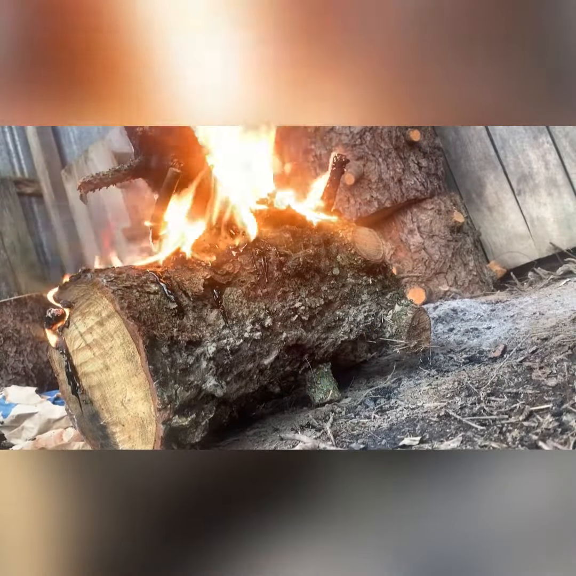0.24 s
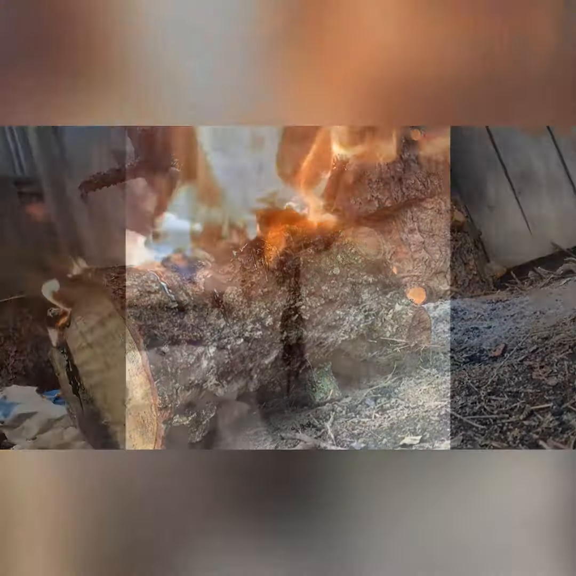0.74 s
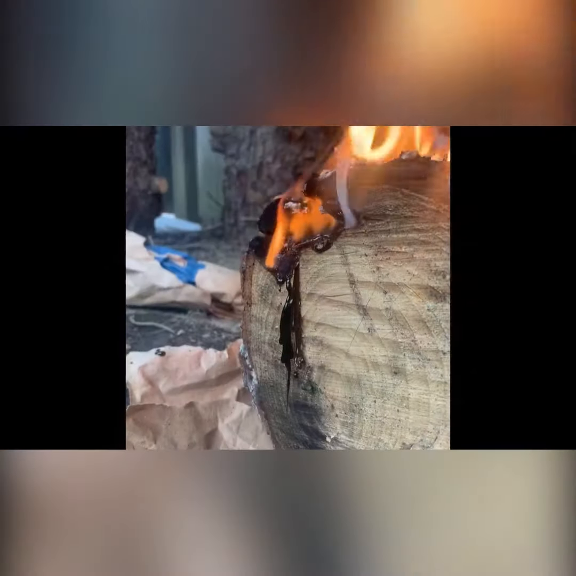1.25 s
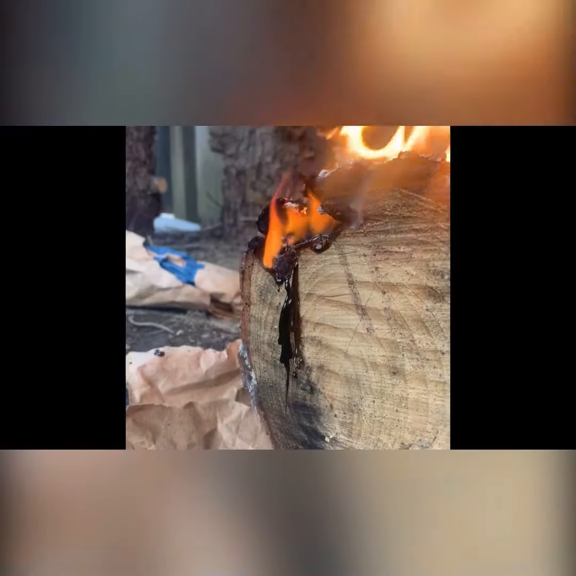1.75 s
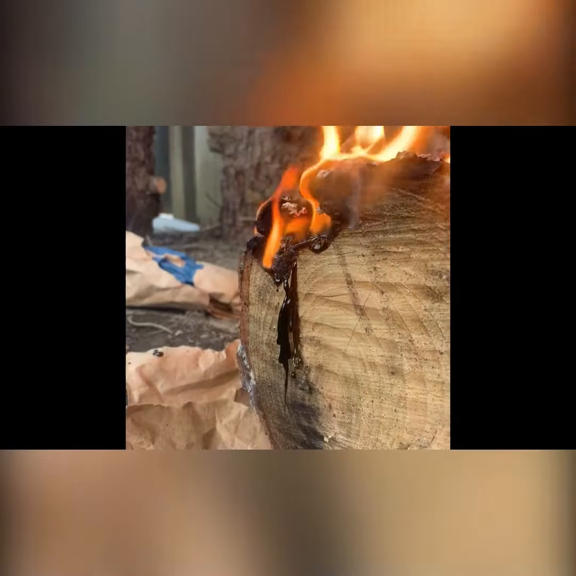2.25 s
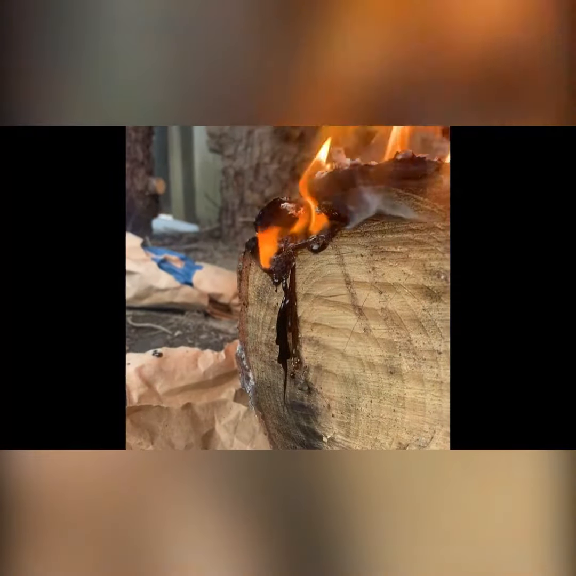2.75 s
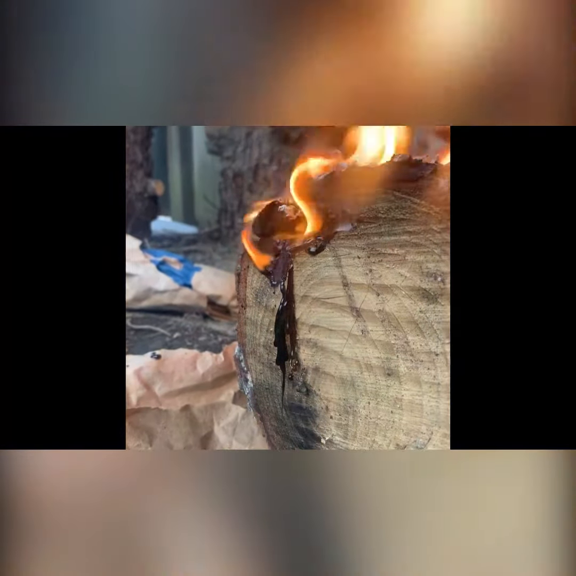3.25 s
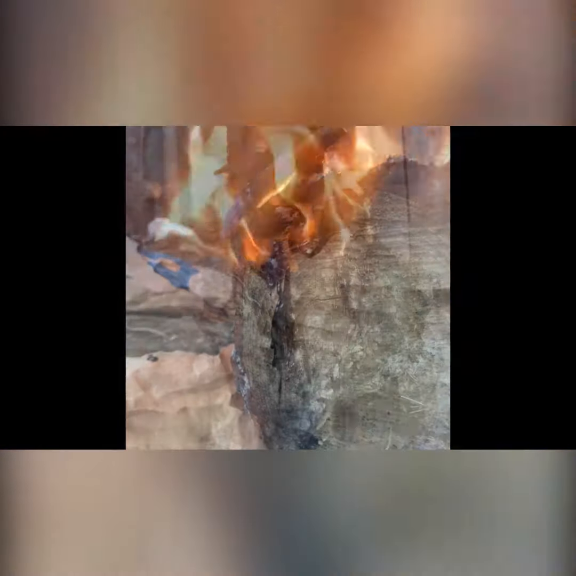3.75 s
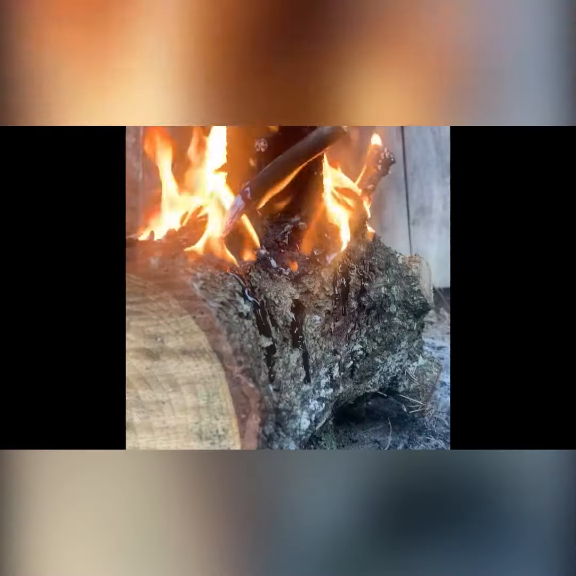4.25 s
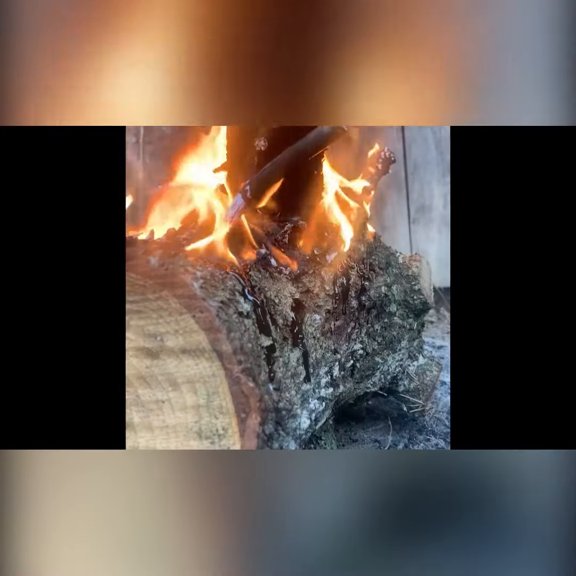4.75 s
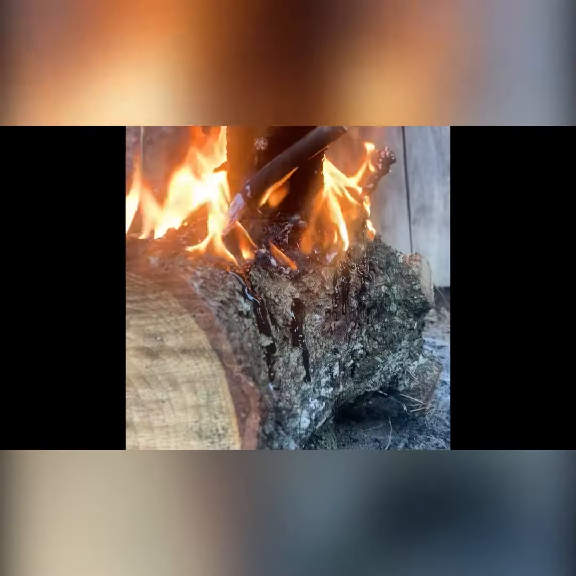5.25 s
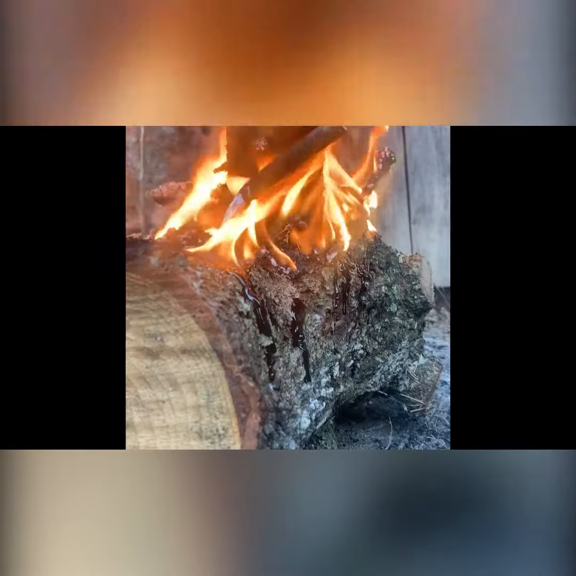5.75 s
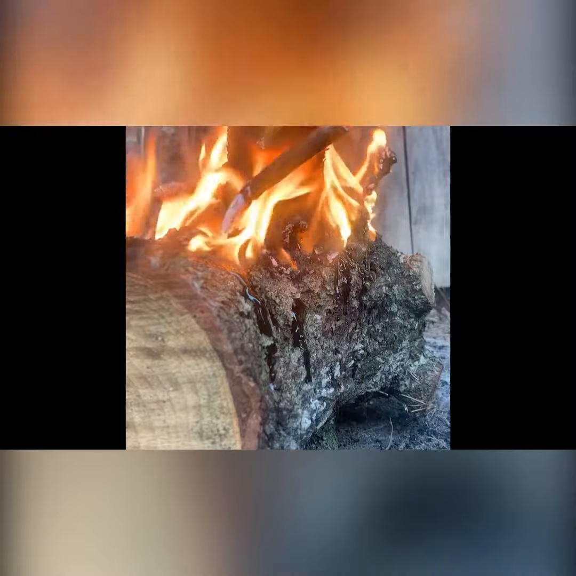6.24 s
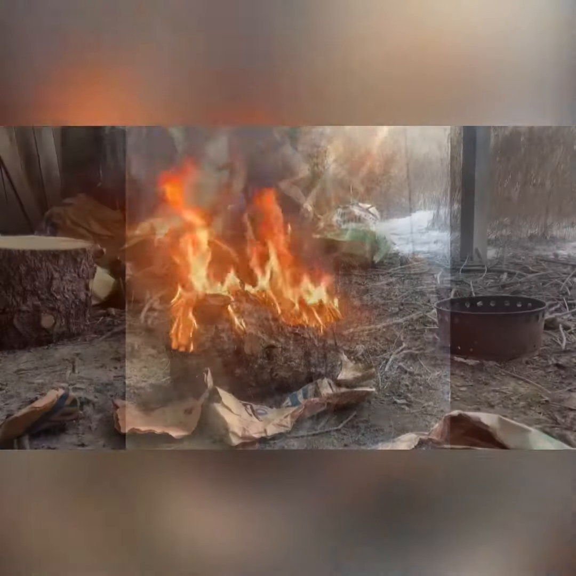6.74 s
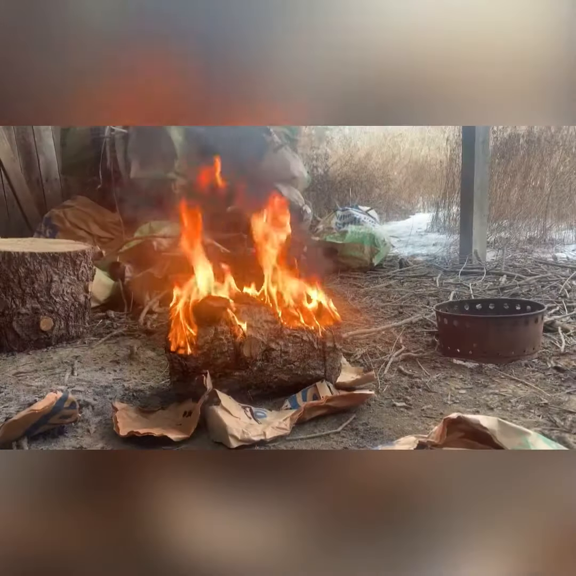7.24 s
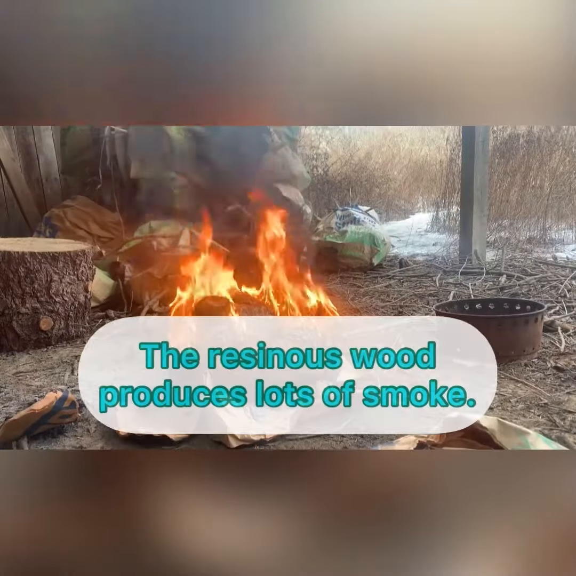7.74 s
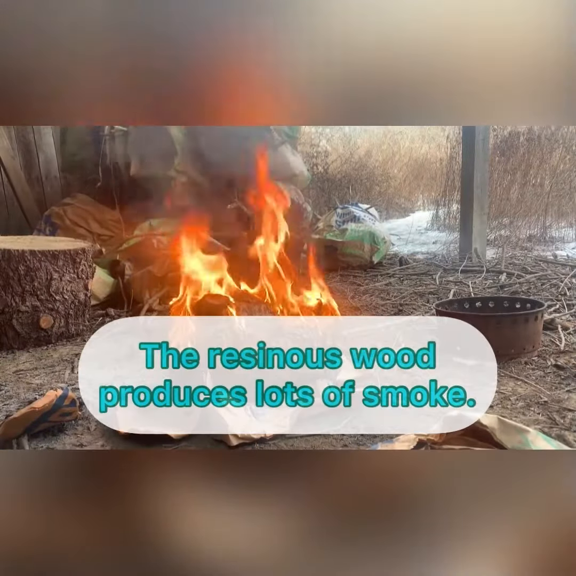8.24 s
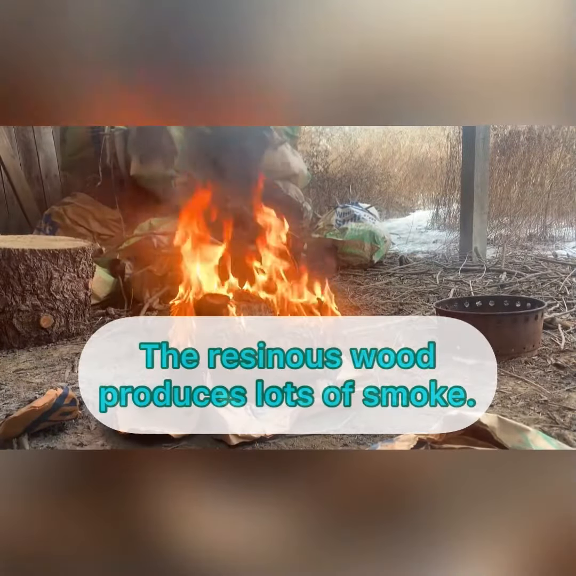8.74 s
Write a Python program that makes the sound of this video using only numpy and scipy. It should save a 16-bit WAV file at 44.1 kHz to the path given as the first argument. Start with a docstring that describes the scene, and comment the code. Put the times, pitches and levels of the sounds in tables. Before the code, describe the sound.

A resinous log burns in an open shed, heard close in stereo. Throughout, a quiet low rumble throbs unevenly, flames flap softly above it, and boiling sap makes a high fizz full of tiny cracks. From 0.3 to 0.75 s a tight cluster of snaps, dull ticks and woody knocks breaks out, then thins. A very loud dry crack comes at 1.8 s, another at 3.2 s, and a strong woody snap at 3.5 s. Steam sputters briefly after some pops, longest around 4.8 s; 4 to 6 s is calmer. Around 6.6 s the position moves quickly farther away and faces the other way: the rumble weakens, while bright pops grow crowded, especially 7.2 to 7.6 s and around 8.2 s. Short dry litter scuffs occur near 6.95, 7.1, 7.35, 7.55 and 8.8 s. A sharp snap lands at 8.8 s; crackling continues to the end at about 9 s.

```python
"""Flames rumble and sap fizzes as a resinous log burns in an open shed, with dull ticks, pops and steam jets
throughout. Two microphone ports a few centimetres apart hear it. Around 6.6 s the listener's place becomes a
farther one, turned the other way, and then dry litter rustles underfoot. Flames, fizz, steam and litter are
shaped noise; pops are spikes and short noise sent through resonances; ticks are brief, noisy sine waves."""
import sys
import numpy as np
from scipy import signal
from scipy.fft import rfft, irfft, next_fast_len
from scipy.io import wavfile
from scipy.ndimage import uniform_filter1d, map_coordinates

SR = 44100
rng = np.random.default_rng(int(sys.argv[2]) if len(sys.argv) > 2 else 0)


def put_to_file(sound):
    """Save the sound as 16-bit audio at rate SR, in the file named by the first command-line argument."""
    columns = np.atleast_2d(sound).T  # one column per channel
    safe = np.clip(columns, -1, 1)
    whole_steps = np.round(safe * 32767)
    wavfile.write(sys.argv[1], SR, whole_steps.astype(np.int16))


N = 397341  # length in samples

# start and end of the move from the near place to the far one: t/s
STEP_BACK = (6.5, 6.75)


def amp(db):
    """Turn decibels into a gain."""
    return 10 ** (np.asarray(db) / 20)


def unit(x):
    """Scale to an average strength (rms) of 1."""
    return x / np.sqrt(np.mean(x ** 2) + 1e-20)


def along(points, hz):
    """Read a value between (f/Hz, value) points on a logarithmic frequency axis."""
    f, value = np.transpose(points)
    return np.interp(np.log(hz + 1), np.log(f + 1), value)


def wobble(rate):
    """A smooth random curve through `rate` random points a second."""
    knots = rng.standard_normal(int(N * rate / SR) + 4)
    return map_coordinates(knots, [np.arange(N) * rate / SR])


def filtered(x, response):
    """Multiply the spectrum of x by a response, which may be complex."""
    m = next_fast_len(N + 8192)
    return irfft(rfft(x, m) * response(np.fft.rfftfreq(m, 1 / SR)), m)[..., :N]


def resonance(centre_hz, width_hz):
    """A ringing band-pass with gain 1 at its centre."""
    return lambda f: 1j * f * width_hz / (centre_hz ** 2 - f * f + 1j * f * width_hz)


def patchy(channels, patchy_db):
    """White noise with patches of random gain in time and pitch, shared by its channels."""
    z = signal.stft(rng.standard_normal((channels, N)), nperseg=512)[2]
    field = uniform_filter1d(rng.standard_normal(z.shape[1:]), size=8, axis=0)
    field = uniform_filter1d(field, size=6, axis=1)
    return signal.istft(z * amp(patchy_db * unit(field)), nperseg=512)[1][:, :N]


def diffuse(spectrum, patchy_db):
    """Stereo noise of rms 1 from all around: the ports hear it alike only where waves are long."""
    # left-right likeness of sound from all around: f/Hz, likeness (1 is the same at both ports)
    likeness = [(60, .985), (130, 0.96), (290, .9), (640, 0.42), (1400, 0.015), (3000, 0.083)]

    def mid_and_side(hz):
        angle = np.arccos(np.clip(along(likeness, hz), -1, 1)) / 2
        return amp(along(spectrum, hz)) * [np.cos(angle), np.sin(angle)]

    mid, side = filtered(patchy(2, patchy_db), mid_and_side)
    return unit(np.array([mid + side, mid - side]))


def bursts(seconds, db, t60, spike, size=600, sputter_db=0):
    """A spike and noise falling 60 dB in t60 seconds at each time, cut after `size` samples."""
    k = np.arange(size)
    # sputtering noise comes in ragged spits of 30 samples
    spit_db = np.clip(rng.standard_normal((len(seconds), size // 30 + 1)), -2, 1.5)
    spits = amp(sputter_db * np.repeat(spit_db, 30, axis=1)[:, :size])
    noise = rng.standard_normal((len(seconds), size))
    shape = spits * noise * amp(-60 * k / SR / np.clip(t60, 1e-4, 1))
    shape[:, 0] = -spike
    where = np.round(seconds * SR).astype(int)[:, None] + k
    return np.bincount(where.ravel(), (amp(db)[:, None] * shape).ravel(), N + size + 1)[:N]


def far():
    """0 at the near place, 1 at the far one, with a straight ramp between."""
    return np.interp(np.arange(N) / SR, STEP_BACK, [0, 1])


def ports(near_sound, far_sound):
    """Sound from the log reaches one port first; the housing makes one port weaker at some pitches."""
    # phase by which the left port leads, a plain delay in the treble, bent by the housing below:
    # f/Hz, phase/rad
    lead_near = [(1200, 0), (3400, 2.8), (4200, 2.2), (5200, 3.2), (12300, 9.4), (17000, 13.7)]
    lead_far = [(1500, 0), (3000, 2.5), (4500, 2), (6500, 3.1), (11700, -3.1), (17000, -10.3)]
    # left port over right port: f/Hz, level difference/dB
    shade_near = [(300, 0), (1000, -3), (2400, -5), (4500, 0), (16000, 0)]
    shade_far = [(300, 0), (1800, 2), (3000, -1), (5500, -4), (7500, 0), (16000, 0)]
    half = np.array([[.5], [-.5]])  # each port takes half of the difference

    def path(lead, shade):
        return lambda hz: (amp(half * along(shade, hz))
                           * np.exp(1j * half * np.interp(hz, *np.transpose(lead))))

    return (filtered(near_sound, path(lead_near, shade_near))
            + filtered(far_sound, path(lead_far, shade_far)))


def placed(sound):
    """Short sounds are heard from one place or the other, switching halfway through the move."""
    # colour of short sounds from afar: f/Hz, gain/dB
    distant_colour = [(1000, -10), (2000, -0.5), (3300, -10.5), (5000, -3.5), (6500, -3.5), (9500, -0.5),
                      (13000, -5.5), (16000, -9)]
    distant = filtered(sound * (far() >= .5), lambda hz: amp(along(distant_colour, hz)))
    return ports(sound * (far() < .5), distant)


def wood(f):
    """The log's broad, dull ring, made of overlapping resonances."""
    return resonance(1800, 1500)(f) * resonance(1500, 3500)(f) - 0.13 * resonance(950, 400)(f)


def control(column):
    """How strongly the fire burns: one column of its table, and its swing about the mean."""
    # the fire, before each layer's own lift and wobble:
    # t/s, flame rumble level/dB, sap fizz level/dB, flapping tongues level/dB
    fire = [(0.0, -47, -60, -64.5), (0.43, -49, -60.5, -59), (0.9, -48.5, -61.5, -64.5),
            (1.36, -46, -58.5, -62.5), (2.53, -47.5, -59, -60.5), (2.76, -43.5, -58.5, -58.5),
            (3.49, -44.5, -56.5, -62.5), (3.86, -48, -59, -65), (4.39, -45, -58, -59),
            (4.84, -46.5, -58, -64), (5.67, -48.5, -59, -63), (6.0, -43, -58.5, -62),
            (6.45, -47, -58.5, -62), (6.75, -49.5, -60, -64.5), (7.98, -52, -61.5, -66),
            (8.16, -49.5, -60.5, -68.5), (8.4, -52, -62, -69.5), (9.01, -50.5, -59.5, -68.5)]
    rows = np.transpose(fire)
    db = np.interp(np.arange(N) / SR, rows[0], rows[column])
    return db, db - db.mean()


def flames():
    """Flames flutter: the rumble throbs, tongues flap above it, a roar swinging with the fizz on top."""
    # noise colours: f/Hz, relative level per Hz/dB
    rumble_colour = [(15, -32), (25, -31.5), (45, -12), (63, -7), (71, 1), (80, -6), (110, -11), (200, -19),
                     (260, -52), (440, -120)]
    flap_near_colour = [(100, -20), (170, -3), (250, -0.5), (330, -10), (500, -15), (700, -23.5),
                        (1000, -64)]
    flap_far_colour = [(120, -31), (220, -7), (330, -9), (450, -7.5), (700, -22.5), (1000, -26.5)]
    roar_colour = [(400, -30), (700, -2), (1000, -0.5), (1600, 5), (2500, -1.5), (4000, 2), (7000, -34)]
    flutter = wobble(14)  # shared by rumble and tongues
    near, away = np.sqrt(1 - far()), np.sqrt(far())

    rumble_db = control(column=1)[0] + 1.88 * flutter + 0.69 * wobble(5.0)
    rumble = amp(rumble_db) * diffuse(rumble_colour, patchy_db=1.1)

    tongues = near * diffuse(flap_near_colour, patchy_db=2.5)
    tongues = tongues + amp(-1.0) * away * diffuse(flap_far_colour, patchy_db=3.0)
    flap_db = control(column=3)[0] + 3.0 + .9 * wobble(7) + 2.1 * flutter + 0.65 * wobble(30)
    flap = amp(flap_db) * tongues

    # the roar swings with the sap fizz, dB for dB
    roar_db = -65.5 + control(column=2)[1] + .6 * wobble(6) + 1.2 * wobble(40)
    roar = amp(roar_db) * diffuse(roar_colour, patchy_db=2.2)
    return rumble + flap + ports(near * roar, away * roar)


def fizz():
    """Boiling sap: a hiss with a hail of tiny cracks in clumps, louder against the hiss from afar."""
    # colour of the fizz: f/Hz, gain/dB
    near_colour = [(1500, -30), (3000, -10), (5000, -4.5), (6500, -4.5), (8000, 0), (10000, -3.5),
                   (16000, -4.5)]
    far_colour = [(1500, -30), (3000, -9), (5500, -8), (7000, -3.5), (8500, 0), (10500, -5), (16000, -5)]
    lift_db = 8.5  # makes up for what the colouring takes away
    walls_db, wood_db = -14.5, -5.5
    top_hz = 16000

    def tint(points):
        return lambda hz: amp(along(points, hz)) * (hz < top_hz) * np.clip(hz / 1500, 0, 1)

    hiss = unit(patchy(2, 3.04) * amp(0.34 * wobble(25) + 0.16 * wobble(150)))
    draw = rng.random((5000, 2))  # a time and a size for each crack
    busy = np.cumsum(amp(6.5 * wobble(18)))  # cracks crowd where this climbs steeply
    seconds = np.interp(draw[:, 0], busy / busy[-1], np.arange(N) / SR)
    from_afar = seconds > STEP_BACK[1]
    size_db = -3.8 * np.log(draw[:, 1]) + 5.4 * from_afar  # few are large
    crack_db = np.minimum(size_db, 13 + 4 * from_afar) - 7.5
    cracks = bursts(seconds, crack_db, 0.004, spike=3.6, size=150)

    level = amp(control(column=2)[0] + lift_db + 0.14 * wobble(7.3))
    near = filtered(level * np.sqrt(1 - far()) * (hiss[0] + cracks), tint(near_colour))
    away = filtered(level * np.sqrt(far()) * (hiss[1] + cracks), tint(far_colour))
    # hiss scattered back from the walls
    scattered = amp(walls_db) * filtered(level * rng.standard_normal((2, N)), tint(far_colour))
    knocks = amp(wood_db) * placed(filtered(level * cracks, wood))
    return ports(near, away) + scattered + knocks


def faint_ticks(count):
    """Faint ticks at chance times, all low, in rows like the timed ones."""
    draw = rng.standard_normal((count, 2))
    seconds = rng.random(count) * N / SR
    db = -52 + 3 * draw[:, 0]
    hz = 325 * np.exp(0.18 * draw[:, 1])
    return np.column_stack([seconds, db, hz])


def ticks():
    """Settling bark and coals: each tick is a push of two or three cycles, softly started."""
    # ticks at set times, strong and weak, before the lift: t/s, level/dB, pitch f/Hz
    timed_ticks = [(0.022, -40, 540), (0.279, -50, 380), (0.327, -38.5, 460), (0.382, -48, 600),
                   (0.415, -39, 396), (0.46, -46, 800), (0.472, -45, 450), (0.509, -42, 350),
                   (0.535, -48, 550), (0.707, -51, 600), (0.506, -28.5, 1640), (0.601, -48, 372),
                   (0.602, -45, 1300), (0.638, -47, 700), (0.683, -44, 460), (1.239, -48, 350),
                   (1.285, -49, 350), (1.448, -43, 310), (1.835, -42, 350), (1.786, -45, 1060),
                   (2.312, -44.5, 500), (2.348, -36, 420), (2.348, -31.5, 1180), (2.433, -54, 350),
                   (3.188, -44.5, 305), (3.315, -51, 350), (4.35, -42, 270), (4.386, -43, 273),
                   (4.605, -46, 400), (4.719, -54, 308), (4.972, -56, 336), (5.033, -40, 310),
                   (5.078, -42, 287), (5.106, -39.5, 326), (5.322, -54, 324), (5.62, -34, 1350),
                   (5.901, -47, 346), (6.244, -42, 350), (6.516, -49, 350), (6.754, -38, 350),
                   (6.952, -43, 760), (6.957, -32.5, 229), (7.397, -32.5, 367), (7.553, -45, 1420),
                   (7.636, -37, 298)]
    lift_db = 6.0
    grit = 1.1  # noise riding on each tick, against its tone
    s, db, hz = np.vstack([timed_ticks, faint_ticks(count=8)]).T[:, :, None]
    k = np.arange(900)
    cycles = hz * k / SR
    fall = amp(-60 * cycles / 5.0)  # 60 dB in five cycles
    soft_start = 1 - np.exp(-cycles / 0.37)
    roughness = 1 + grit * rng.standard_normal((len(s), len(k)))
    shape = np.sin(2 * np.pi * cycles) * fall * soft_start * roughness
    where = np.round(s * SR).astype(int) + k
    sound = np.bincount(where.ravel(), (amp(db + lift_db) * shape).ravel(), N + len(k) + 1)[:N]
    return placed(filtered(sound, lambda f: 1 / (1 + 1j * f / 2500)))  # gentle treble cut


def small_pops(count):
    """Small pockets burst in clumps at chance times, in rows like the timed ones."""
    # snap, knock and brightness of small pockets, one row each: mean/dB, spread/dB
    small = [(-43, 2.5), (-14, 5), (-5, 5)]
    far_busy_db = 11  # they are heard more often at the far place
    busy = np.cumsum(amp(7 * wobble(9.8) + far_busy_db * far()))
    seconds = np.interp(rng.random(count), busy / busy[-1], np.arange(N) / SR)
    mean_db, spread_db = np.transpose(small)
    rows = mean_db + spread_db * np.clip(rng.standard_normal((count, len(small))), -2, 2)
    return np.column_stack([seconds, rows])


def pops():
    """A pocket splits with a snap, knocks the wood and puffs out steam; nearby surfaces answer."""
    # resin pockets at set times, loud and faint, before each part's own trim;
    # knock is against the snap, brightness is the crisp part against the dull part:
    # t/s, snap level/dB, wood knock level/dB, brightness level/dB
    timed_pops = [(0.0724, -37, -25, 0), (0.0898, -32.5, -28, 6), (0.2887, -42, -25, 0),
                  (0.2934, -32, -46, 8), (0.4139, -36.5, -26, -10), (0.4173, -40, -30, -20),
                  (0.4294, -29, -34, 6), (0.4338, -31, -20, 2), (0.4415, -28, -15, 10),
                  (0.4558, -42.5, 0, 3), (0.4652, -34.5, -3, -15), (0.4718, -37, -9, 3),
                  (0.5076, -24, -11.5, -32), (0.5642, -45, -13, -6), (0.6292, -42, -27, -18),
                  (0.6768, -28, -15, -24), (0.6857, -41, -25, -8), (0.702, -30.5, -27, 6),
                  (0.7277, -39, -15, 2), (0.7337, -38, -16, 2), (0.7406, -38, -25, 0),
                  (0.9771, -43, -21, 8), (0.9871, -40, -18, 12), (1.0554, -43, -16, -14),
                  (1.159, -28.5, -37, 7), (1.2766, -33.5, -13, -10), (1.2972, -33, -11, -7),
                  (1.5935, -42.5, 0, -5), (1.6033, -33.5, -19, 5), (1.6247, -36, -12, 0),
                  (1.7487, -24.5, -13, -25), (1.78, -31, -25, 10), (1.7868, -8, -27, 1.5),
                  (1.851, -28, -27, 6), (1.8692, -40, -6, -10), (1.9239, -23.5, -40, 3),
                  (1.9374, -35, -29, 6), (1.9324, -48, 0, -5), (1.9925, -37, 1, -18), (2.166, -43, 0, -13),
                  (2.312, -52, 0, -10), (2.348, -34, -11, -2), (2.6604, -36, -6, -6), (2.7733, -25, -21, 6),
                  (2.8533, -48, 0, -4), (2.8669, -46, 6, -5), (2.9602, -34.5, -15, 0),
                  (2.9704, -26, -45, 7), (3.0051, -41, -5, -10), (3.083, -32.5, -33, -23),
                  (3.1598, -31.5, -3, -5), (3.1896, -8.5, -20, 0.5), (3.3103, -34, -5, -17),
                  (3.3545, -33, -22, -7), (3.3632, -31.5, -28, -3), (3.4467, -35, -22, 0),
                  (3.4521, -35.5, -17, -7), (3.5, -39, -2, -10), (3.5325, -22, -30, 1),
                  (3.5358, -26, -24, -2), (3.5368, -16.5, -8, -2), (3.6084, -32, -5.5, 4),
                  (3.6527, -40, -16, -7), (3.6619, -37.5, -10, -2), (3.7622, -28, -2.5, -10),
                  (3.7796, -46, 4, -10), (3.8085, -38.5, -3, -12), (3.8483, -27.5, -3, 5),
                  (3.8585, -33, -25, 5), (3.8679, -42, -25, 2), (3.8849, -39, -25, 2),
                  (4.0156, -23.5, -34, 6.5), (4.0841, -34.5, -12, -2), (4.2849, -36, -9, 9),
                  (4.2917, -35, -28, 2), (4.3619, -34, -16, -3), (4.3863, -49, 5, -15),
                  (4.4647, -37.5, -17, -10), (4.559, -26.5, -40, 3), (4.6377, -46, -12, 0),
                  (4.7731, -52, 15.5, -12), (4.813, -50, 2, -10), (4.878, -41.5, -4, -12),
                  (4.927, -39.5, -3, -10), (5.0329, -27.5, -37, 2.5), (5.0431, -37, -24, -6),
                  (5.0527, -34, -24, 3), (5.0851, -41, -8, -8), (5.1297, -31.5, -29, -22),
                  (5.153, -31, -28, -3), (5.1577, -42, -12, -10), (5.1632, -36, -27, 1),
                  (5.1884, -43, -20, -5), (5.3049, -35, -14, 4), (5.3841, -39.5, -10, -24),
                  (5.723, -35, -12, 5), (5.8112, -35.5, -3.5, -14), (5.8172, -44.5, 5, -17),
                  (5.8407, -40, -20, 0), (5.8983, -49, 3, -8), (5.9083, -54, 6, -8),
                  (6.1473, -34.5, -18, -27), (6.2713, -50, 6, -18), (6.299, -26, -62, 1),
                  (6.4646, -22, -8, 2), (6.486, -30.5, -13, -3), (6.5138, -33, -29, -4),
                  (6.6036, -38, -12, -1), (6.6182, -40, -20, 3), (6.691, -49, 1, -5), (6.7234, -35, -10, 4),
                  (6.7533, -20, -31, 1.5), (6.8449, -36, -15, 6), (6.8597, -36, -6, 0),
                  (6.8718, -15.5, -20, 14), (6.8987, -33, -25, -3), (6.9878, -34, -29, 4),
                  (7.0322, -41, -24, 0), (7.0944, -26.5, -36, -20), (7.1581, -31, -26, 2),
                  (7.1807, -31, -13, -1), (7.2354, -32, -30, 5), (7.2443, -49, 4, -5),
                  (7.2918, -34, -26, 2), (7.299, -28, -16, 14), (7.3119, -36, -25, 0), (7.3342, -43, 0, -5),
                  (7.3422, -32, -8.5, 6), (7.394, -39, -9, 1), (7.407, -31, -10, 5), (7.4177, -36, -17, -1),
                  (7.4349, -32, -18, 3), (7.4426, -22, -11.5, 12), (7.4522, -38, -25, 0),
                  (7.4559, -27, -20, 2), (7.4914, -38, -25, 0), (7.4997, -26.5, -17, 0),
                  (7.5135, -25, -39, 4), (7.5636, -20.5, -24, 4), (7.6523, -37, -20, -9),
                  (7.659, -35, -4, -8), (7.6886, -27.5, -31, 5), (7.7133, -36, -22, -5),
                  (7.8916, -19.5, -10.5, 26), (7.9632, -35, -18, -9), (8.0018, -36, -15, 7),
                  (8.0364, -36, -14, 4), (8.0446, -35, -16, 6), (8.0946, -34, -21, -4),
                  (8.1188, -25.5, -9, 4), (8.1522, -33, -17, 2), (8.1573, -35, -30, 10),
                  (8.1612, -37, -25, 2), (8.1855, -41, -12, -6), (8.1951, -29, -36, 4),
                  (8.2067, -24.5, -4, 10), (8.2256, -35, -5, 3), (8.2415, -34.5, -25, 0),
                  (8.2468, -35, -16, -10), (8.2795, -32, -24, 1), (8.2916, -23.5, -34, 2),
                  (8.3044, -37, -11, -11), (8.3257, -35, -22, 6), (8.3767, -28, -35, 12),
                  (8.3798, -27, -34, -1), (8.4458, -41, -20, 2), (8.5301, -38, -25, 0),
                  (8.5476, -32, -16, 0), (8.5575, -40, -20, 0), (8.5777, -32.5, -24, 7),
                  (8.5808, -38, -25, 0), (8.6034, -45, -5, 0), (8.6117, -31, -10, 8), (8.6953, -40, -25, 0),
                  (8.7169, -50, 3, -8), (8.7395, -42, -25, 2), (8.763, -21.5, -17, 8),
                  (8.7921, -16, -32, 7), (8.8893, -37, -23, 6), (8.9208, -41, 2, -1), (8.9284, -54, -1, -5),
                  (8.9705, -46.5, 6.5, -3)]
    snap_s, knock_s, puff_s, shed_s = .006, .01, .028, .09  # times to fall 60 dB
    scatter_snap_s, scatter_knock_s = .009, .01  # the same for scattered sound
    shed_db = -36  # against the snap
    bounce_s, bounce_db = 0.00062, -25  # echo off the ground

    s, snap_db, knock_db, bright_db = np.vstack([timed_pops, small_pops(count=90)]).T
    puff_db = -24 + 2.5 * np.clip(rng.standard_normal(len(s)), -2, 2)  # against the snap
    dull_db = snap_db - 10 * np.log10(1 + amp(2 * bright_db))  # the part of the snap below 10 kHz
    crisp_db = dull_db + bright_db
    wood_db = snap_db + knock_db + 2.5

    sound = filtered(bursts(s, dull_db - 7.0, snap_s, spike=27.2), resonance(6470, 1730))
    sound -= filtered(bursts(s, crisp_db - 5.5, snap_s, spike=14.3), resonance(12840, 8500))
    # the crisp edge
    sound += filtered(bursts(s, crisp_db - 6.5, 0.004, spike=19), resonance(14600, 3500))
    sound += filtered(bursts(s, wood_db, knock_s, spike=6.5), wood)
    # the split's hollow ring
    sound += filtered(bursts(s, dull_db - 5.5, 0.003, spike=14), resonance(4250, 600))
    puff = bursts(s, snap_db + puff_db, puff_s, spike=0, size=1200, sputter_db=9.0)
    sound += filtered(puff, resonance(6600, 8000))
    sound = filtered(sound, lambda f: 1 + amp(bounce_db) * np.exp(-2j * np.pi * f * bounce_s))

    # bark and neighbouring logs scatter the middle of each snap differently to each port
    scatter = [bursts(s, dull_db - 8.0, scatter_snap_s, spike=0)
               + bursts(s, wood_db, scatter_knock_s, spike=0) for _ in range(2)]
    scattered = filtered(np.array(scatter) * amp(-5 * far()), resonance(3640, 2800))
    # the shed answers 3.7 ms later
    shed = [bursts(s + 0.0037, snap_db + shed_db, shed_s, spike=0, size=4000) for _ in range(2)]
    return placed(sound) + filtered(np.array(shed), resonance(2000, 3400)) + scattered


def jets():
    """Steam sputters on after a pocket opens: ragged spits of noise dying away."""
    # steam jets, before the colouring: t/s, level/dB, time to fall 60 dB/s
    steam = [(0.4355, -57, 0.098), (0.472, -46, 0.058), (0.686, -49, 0.11), (1.593, -51, 0.15),
             (1.9918, -43, 0.098), (2.163, -45, 0.15), (3.161, -41, 0.17), (3.8468, -42, 0.07),
             (4.387, -48, 0.12), (4.7716, -46.5, 0.34), (5.04, -64, .15), (5.154, -48, 0.085),
             (5.306, -51.5, 0.22), (5.333, -48, 0.13), (5.8168, -43, 0.18), (6.1485, -48.5, 0.068),
             (7.418, -46, 0.22), (7.526, -47, 0.086), (8.2793, -49, 0.047), (8.5476, -45, 0.12)]
    s, db, t60 = np.transpose(steam)
    spits = bursts(s, db, t60[:, None], spike=0, size=5000, sputter_db=8.5)
    return placed(filtered(spits, lambda f: resonance(3700, 7000)(f) ** 2))


def rustles():
    """Short scuffs of dry litter, lumpy noise in three low resonances."""
    # rustles of litter, before the fade and the left-right trim:
    # t/s, length/s, level/dB, low share against it/dB
    scuffs = [(6.945, 0.041, -55.5, 6), (7.106, 0.089, -66, -3), (7.357, 0.059, -64.5, -2),
              (7.546, 0.12, -55.5, -1.5), (8.81, 0.06, -66, -12)]
    top_hz, fade_db = 1800, 3  # upper edge; loss over a rustle's length
    t, level, low_level = np.arange(N) / SR, np.zeros(N), np.zeros(N)
    for s, length, db, low_db in scuffs:
        edges = np.clip(np.minimum((t - s) / 0.0031, (s + length - t) / 0.016), 0, 1)
        shape = edges * amp(-fade_db * np.clip((t - s) / length, 0, 1))
        level += amp(db) * shape
        low_level += amp(db + low_db) * shape
    grit = rng.standard_normal((2, N)) * amp(4 * np.array([wobble(150), wobble(150)]))

    def twice(hz, width_hz):
        return lambda f: resonance(hz, width_hz)(f) ** 2 / (1 + (f / top_hz) ** 12)

    high = unit(filtered(grit, twice(1500, 600))) * amp([[4], [-6]])  # stronger on the left
    low = unit(filtered(grit[0], lambda f: twice(760, 260)(f) - 0.47 * twice(480, 350)(f)))
    return level * high + low_level * low


def scene():
    """All the sounds of the fire and the litter together."""
    return flames() + fizz() + ticks() + pops() + jets() + rustles()


def record(dry):
    """The recorder rounds off the very loudest peaks and keeps nothing above its band limit."""
    rounded = dry / (1 + np.abs(dry) ** 5) ** (1 / 5)
    return filtered(rounded, lambda hz: hz < 16900)


dry = scene()
out = record(dry)
put_to_file(out)
```